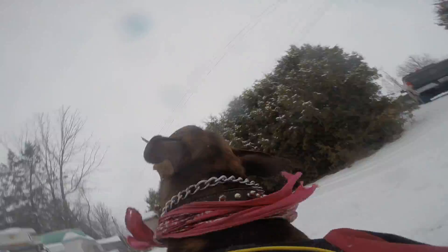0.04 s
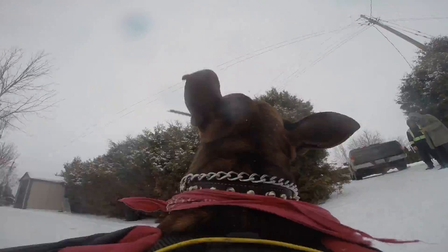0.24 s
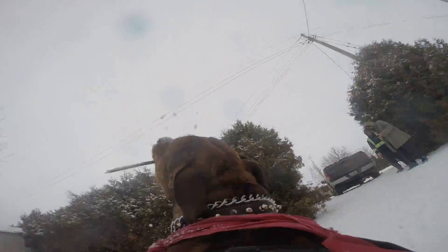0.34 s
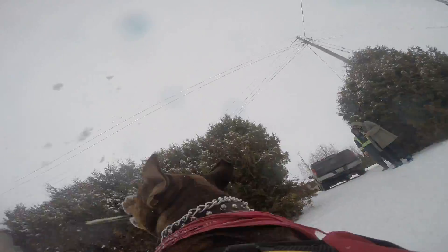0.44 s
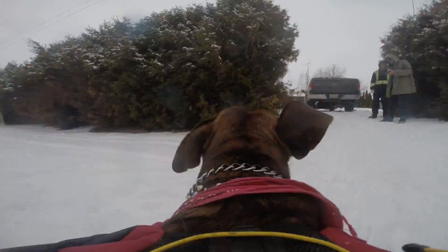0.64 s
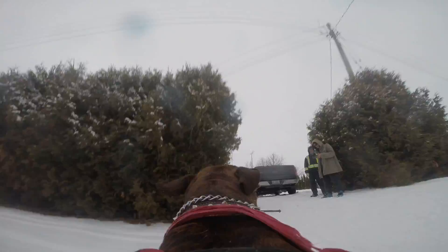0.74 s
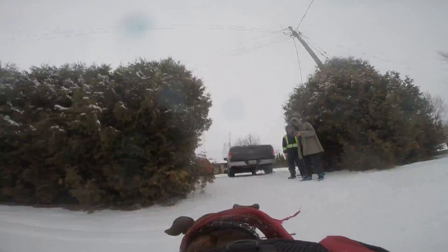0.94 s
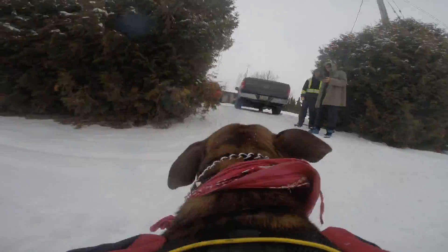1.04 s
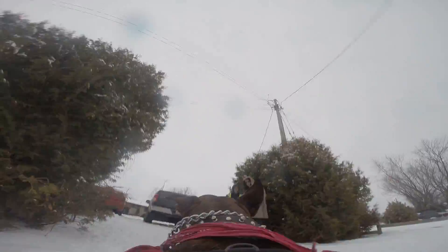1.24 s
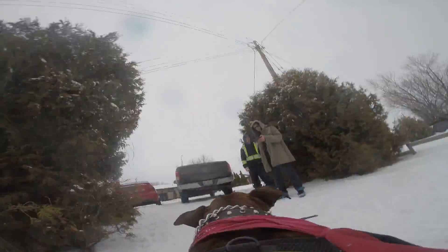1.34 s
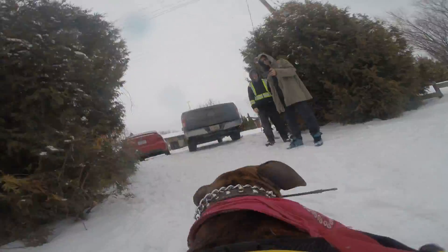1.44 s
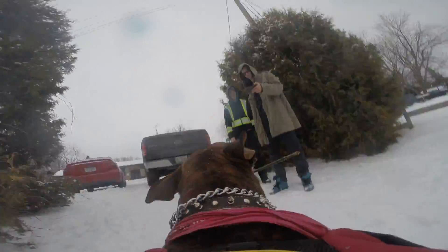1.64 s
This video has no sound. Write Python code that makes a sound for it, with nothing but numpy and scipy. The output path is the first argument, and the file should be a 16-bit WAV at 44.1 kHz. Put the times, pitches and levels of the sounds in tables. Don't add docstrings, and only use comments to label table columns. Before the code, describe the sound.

A camera mount rattles against its case as a dog trots: fabric rub and ticks with a very faint early chain clink, then several strong knocks with bassy jolts, fading to quiet rubbing; dry, muffled, body-mounted microphone.

```python
import sys
import numpy as np
from scipy import signal
from scipy.io import wavfile

SR = 44100
rng = np.random.default_rng(int(sys.argv[2]) if len(sys.argv) > 2 else 0)


def rack_gain(trim_db):
    fader = np.asarray(trim_db, float)
    return 10 ** (fader / 20)


def dump(signal):
    limited = np.clip(np.atleast_2d(signal).T, -1, 1)
    pcm = np.round(limited * 32767).astype(np.int16)
    wavfile.write(sys.argv[1], SR, pcm)


N = 74970

# f/Hz, width/Hz, level/dB
CASE_HIGH = [(5200, 700, -6), (6800, 450, 0)]
SHELL_LOWPASS = signal.butter(6, 7300, fs=SR, output="sos")


def rms_one(x):
    return x / np.sqrt(np.mean(x ** 2) + 1e-20)


def drift(rate_hz):
    r = np.exp(-80 * np.pi * rate_hz / SR)
    settle = 2000
    white = rng.standard_normal(N // 40 + settle + 2)
    slow = signal.lfilter([1], [1, -2 * r, r * r], white)[settle:]
    return np.interp(np.arange(N) / 40, np.arange(len(slow)), rms_one(slow))


def ring(clicks, f_hz, t60_s):
    r = rack_gain(-60 / (t60_s * SR))
    w = 2 * np.pi * f_hz / SR
    return signal.lfilter([0, np.sin(w)], [1, -2 * r * np.cos(w), r * r], clicks + 1e-18)


def resonate(x, peaks):
    out = 0
    for k, (f_hz, width_hz, db) in enumerate(peaks):
        r = np.exp(-np.pi * width_hz / SR)
        poles = [1, -2 * r * np.cos(2 * np.pi * f_hz / SR), r * r]
        mode = signal.lfilter([1, 0, -1], poles, x + 1e-18) * (1 - r * r) / 2
        out = out + (-1) ** k * rack_gain(db) * mode
    return out


def colour(x, points, patchy_db):
    f_hz, level_db = np.transpose(points)
    together = drift(42.0)
    edges_hz = f_hz[0] * 2 ** np.arange(0, 5.1, .5)
    out = 0
    for k, (low, high) in enumerate(zip(edges_hz, np.minimum(edges_hz[1:], .45 * SR))):
        if low < min(f_hz[-1], .4 * SR):
            db = np.interp(np.log(low * high) / 2, np.log(f_hz), level_db)
            bandpass = signal.butter(2, [low, high], "band", fs=SR, output="sos")
            band = signal.sosfilt(bandpass, x[k % 2])
            out = out + rack_gain(db + patchy_db * (together + drift(19.0))) * band
    return rms_one(out)


def rubbing():
    # t/s, level/dB
    rub_level = [(0, -51), (.1, -57), (.2, -51), (.28, -56), (.37, -58), (.44, -52), (.51, -53),
                 (.545, -58), (.62, -54), (.72, -53), (.81, -60), (.93, -62), (1.0, -58), (1.18, -54),
                 (1.31, -59), (1.42, -70), (1.5, -61), (1.7, -63)]
    # f/Hz, level/dB
    rub_colour = [(900, -6.5), (1400, 4.5), (2000, -1.5), (3000, -12.5), (4300, -19.5), (7000, -42),
                  (9000, -51), (13000, -54.5)]
    # f/Hz, level/dB per Hz
    sway_colour = [(15, -25), (25, 7), (75, -15), (144, -19.5), (479, -46), (509, -33), (730, -17),
                   (900, -41), (1170, -71), (1980, -120)]
    grains_per_s, grain_spread_db, grain_share = 2000, 4, .7
    cavity_hz, cavity_width_hz, patchy_db = 728, 55, 1.5
    rub_db, cavity_db, shell_db = 2, -3, -20.5
    sway_db, sway_follows = 25, 0.1

    white = rng.standard_normal((2, N))
    sizes = rack_gain(grain_spread_db * np.minimum(rng.exponential(1, (2, N)), 4))
    sizes = sizes * rng.choice([-1, 1], (2, N))
    grains = rms_one(sizes * (rng.random((2, N)) < grains_per_s / SR))
    source = grain_share * grains + (1 - grain_share) * white

    fabric = colour(source, rub_colour, patchy_db)
    cavity = resonate(source[0], [(cavity_hz, cavity_width_hz, 0)])
    cavity = rms_one(resonate(cavity, [(cavity_hz, 400, 0)])) * rack_gain(patchy_db * drift(15.0))
    shell = rms_one(signal.sosfilt(SHELL_LOWPASS, resonate(source[1], CASE_HIGH)))
    sound = rack_gain(rub_db) * fabric + rack_gain(cavity_db) * cavity + rack_gain(shell_db) * shell

    t_s, db = np.transpose(rub_level)
    level_db = np.interp(np.arange(N) / SR, t_s, db)
    sway_gain = rack_gain(sway_db + sway_follows * (level_db - db.mean()))
    sway = sway_gain * colour(rng.standard_normal((2, N)), sway_colour, 0.5)
    return rack_gain(level_db) * (sound + sway)


def hiss():
    lowpass = signal.butter(4, 12000, fs=SR, output="sos")
    return rack_gain(-86.5) * signal.sosfilt(lowpass, rng.standard_normal(N))


def hit(t_s, peak_db, treble_db, burst_ms, spot_hz):
    # f/Hz, width/Hz, level/dB
    case_low = [(370, 124.5, 7), (810, 210, 7), (1460, 310, 1.5), (2100, 526, 0), (2668, 394, -3),
                (3866, 1106, -18.5)]
    # f/Hz, width/Hz, level/dB
    case_air = [(9100, 900, -24), (10600, 1000, -18), (13000, 1500, -26), (14900, 600, -27)]
    spot_width_hz, spot_db, wall_cut_hz = 218, 5, 4800
    rise_share, tail_db, tail_s = .25, -24, 0.006
    air_follows = 0.94

    noise = rng.standard_normal(2000)
    seconds = np.arange(len(noise)) / SR
    t = seconds / (burst_ms / 1000)
    burst = noise * (1 - np.exp(-t / rise_share)) * np.exp(-t - 0.6 * t * t)
    tail = rack_gain(tail_db) * noise * (1 - np.exp(-t)) * np.exp(-seconds / tail_s)

    wall = signal.butter(2, wall_cut_hz, fs=SR, output="sos")
    dull = signal.sosfilt(wall, burst + tail)
    low = resonate(dull, [*case_low, (spot_hz, spot_width_hz, spot_db)])
    shell = signal.sosfilt(SHELL_LOWPASS, resonate(burst, CASE_HIGH))
    treble_db = treble_db - 2
    air = rack_gain(air_follows * treble_db) * resonate(burst, case_air)
    high = (rack_gain(treble_db) * shell + air) / abs(shell).max()

    out = np.zeros(N + len(noise))
    i = int(t_s * SR)
    out[i:i + len(noise)] = rack_gain(peak_db) * (low / abs(low).max() + high)
    return out[:N]


def ticks():
    # t/s, peak level/dB, treble level/dB, burst/ms, spot f/Hz
    tick_table = [(.0014, -31.5, -10, 2.3, 680), (.0682, -34, -33, 9.5, 1420),
                  (0.115, -41.5, -28, 1.4, 1880), (.175, -30, -26, 11.4, 1580),
                  (.2117, -33.5, -22, 6, 1460), (0.2404, -35, -41, 8.2, 1170),
                  (0.2583, -40, -23, 3.9, 2150), (0.3234, -27, -15.5, 4.6, 700),
                  (0.3324, -33.5, -15, 0.98, 746.1), (.400, -54, -43, 2.6, 1590),
                  (0.518, -39.5, -4.5, 0.48, 1500), (0.683, -33.5, -45, 5.1, 1470),
                  (0.7005, -34.5, -18, 3.3, 2530), (0.832, -33.5, -23, 1.7, 2100),
                  (0.8845, -34.5, -37, 3.9, 1789), (1.0667, -49, -38, 2, 1540),
                  (1.096, -38.5, -30, 8.4, 1621), (1.1762, -35.5, -35, 1.8, 1680),
                  (1.181, -32.5, -39.5, 7, 1590), (1.274, -36.5, -48.5, 3.3, 1560),
                  (1.2949, -40, -34, 2.7, 1290), (1.326, -38.5, -16, 7.1, 2076),
                  (1.5454, -34.5, -50.5, 1, 1030), (1.555, -38, -39, 3.1, 1597)]
    return sum(hit(t_s, db + 2, treble_db, ms, f_hz) for t_s, db, treble_db, ms, f_hz in tick_table)


def jolts():
    # t/s, peak level/dB, length/ms
    shove_table = [(0.032, -18.5, 9.4), (0.183, -7, 11.6), (0.31, 1, 5.67), (0.441, -4.5, 10),
                   (0.59, -16.5, 9.3), (0.67, -12, 10.8), (0.745, -6.5, 5.3), (.852, -4.5, 2.7),
                   (0.891, -14, 8.3), (1.131, -18, 6.7), (1.335, -5, 4.15), (1.345, -15, 4.43),
                   (1.612, -65, 0.833)]
    # t/s, peak level/dB, length/ms
    pull_table = [
        (0.716, -9, 2),
        (1.11, -7.5, 4.64),
        (1.216, -12, 14.7),
        (1.523, -15.5, 10),
    ]
    t = np.arange(N) / SR
    out = np.zeros(N)
    for sign, table in ((1, shove_table), (-1, pull_table)):
        for t_s, db, ms in table:
            width_s = max(ms, 1) / 1000
            out += sign * rack_gain(db + 6) * np.exp(-.5 * ((t - t_s) / width_s - 1.5) ** 2)
    return out


def clinks():
    # t/s, level/dB, f/Hz, t60/s
    clink_table = [
        (.068, -70, 10200, .03),
        (.084, -67.5, 11400, .09),
        (0.083, -69, 10740, 0.03955),
        (.084, -74, 12500, 0.052),
    ]
    out = np.zeros(N)
    for t_s, db, f_hz, t60_s in clink_table:
        click = rack_gain(db) * (np.arange(N) == int(t_s * SR))
        out += ring(click, f_hz, t60_s)
    return out


def knocks():
    # t/s, peak level/dB, treble level/dB, burst/ms, spot f/Hz
    knock_table = [(0.1435, -23, -47, 1.11, 1160), (0.1492, -23, -45, 1.1, 2440),
                   (0.3078, -22.5, -14.5, 5.4, 660), (0.4213, -29, -26, 5.1, 1777),
                   (.4394, -32, -22, 9, 1570), (0.728, -7, -24, 2.3, 1500), (.738, -7.5, -2, 2.52, 2100),
                   (0.8451, -12, -8, 1.21, 2222), (0.8543, -15.5, -20, 1.75, 2400),
                   (0.8965, -30.5, -9.5, 1.6, 2390), (1.1116, -27.5, -34, 3.5, 1730),
                   (1.1229, -6, -26.5, 1.1, 1460), (1.3359, -6, -12.5, 3.84, 1614),
                   (1.3415, -22.5, -21, 4.6, 1660), (1.3485, -37, -4, 1.4, 1800)]
    # t/s, peak level/dB
    thump_table = [(0.145, -16.5), (0.152, -20), (0.308, -13.5), (0.422, -30), (.729, -0.5), (.845, -6.5),
                   (.855, -10), (.890, -28), (1.122, -4), (1.337, -0.5), (1.55, -27.5), (1.611, -33.5)]
    thump_hz, thump_t60_s, thump_db = 157.3, 0.024, 4.5

    rattle = sum(hit(t_s, db + 2, treble_db, ms, f_hz) for t_s, db, treble_db, ms, f_hz in knock_table)
    push = np.zeros(N)
    for t_s, db in thump_table:
        push[int(t_s * SR)] += rack_gain(db + thump_db)
    soft = signal.sosfilt(signal.butter(2, 450, fs=SR, output="sos"), push)
    return rattle + ring(soft, thump_hz, thump_t60_s)


def scene():
    return (rubbing() + hiss() + ticks() + jolts() + clinks() + knocks())[None]


def top_cut(x):
    return signal.sosfilt(signal.butter(12, 16330, fs=SR, output="sos"), x)


def record(dry):
    clip_top = 1.25
    x = signal.sosfilt(signal.butter(2, 26, "high", fs=SR, output="sos"), dry)
    x = clip_top * np.tanh(x / clip_top)
    x = signal.sosfilt(signal.cheby2(10, 60, 16300, fs=SR, output="sos"), x)
    return top_cut(x)


dry = scene()
out = record(dry)
dump(out)
```